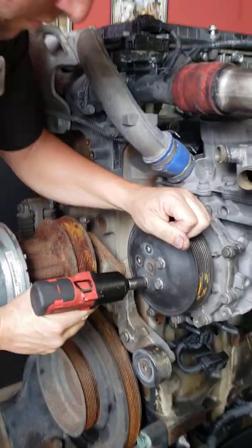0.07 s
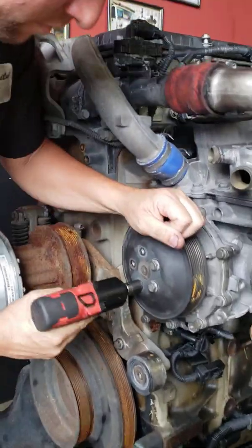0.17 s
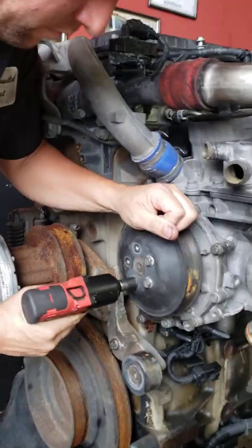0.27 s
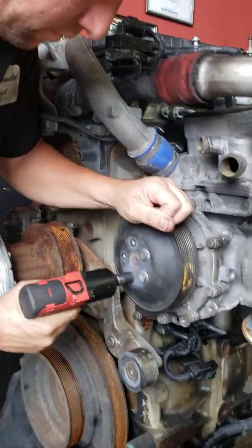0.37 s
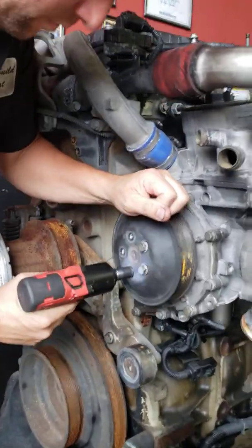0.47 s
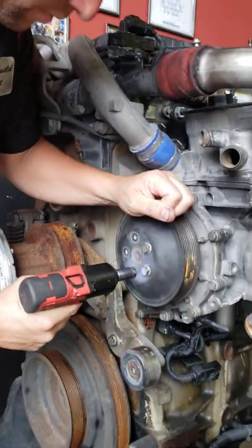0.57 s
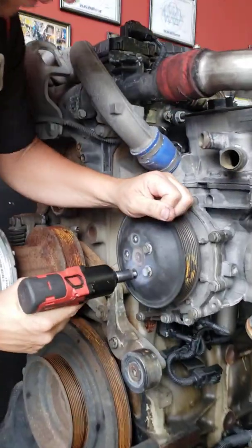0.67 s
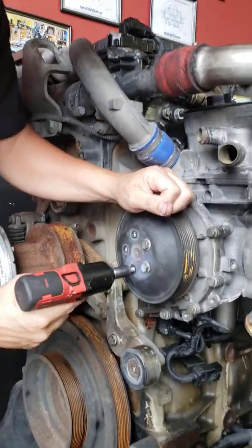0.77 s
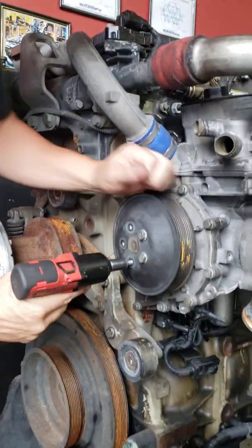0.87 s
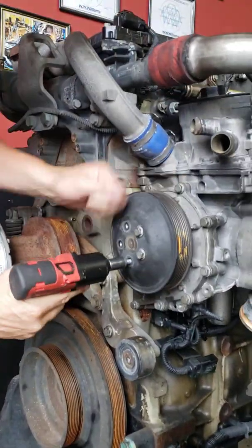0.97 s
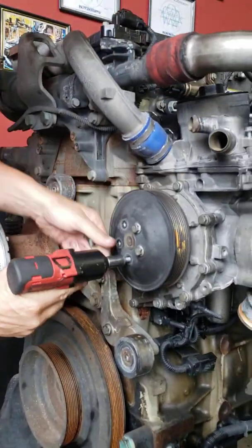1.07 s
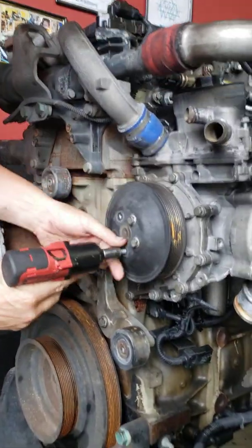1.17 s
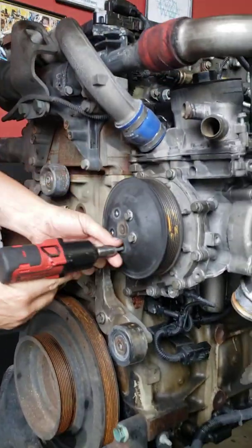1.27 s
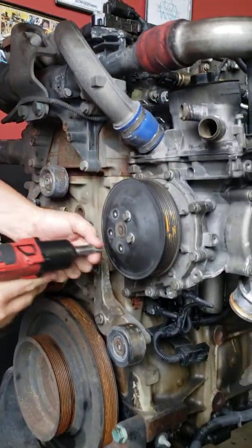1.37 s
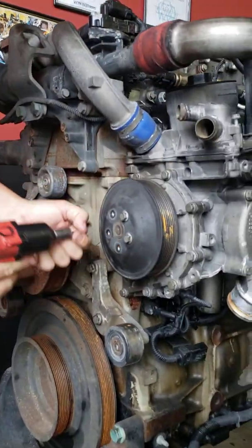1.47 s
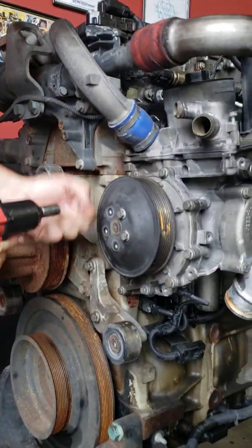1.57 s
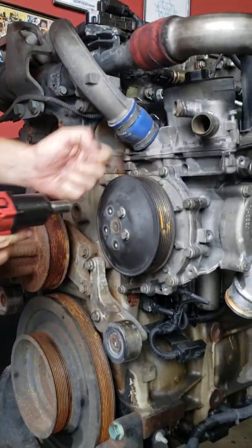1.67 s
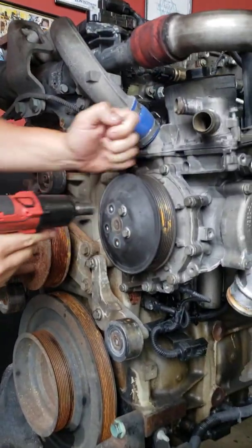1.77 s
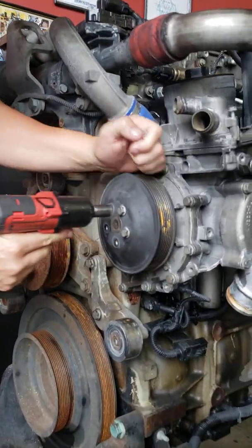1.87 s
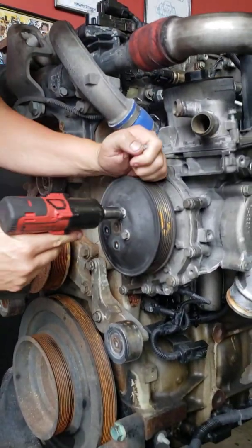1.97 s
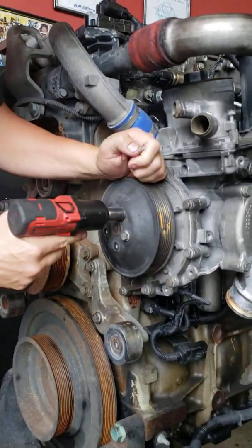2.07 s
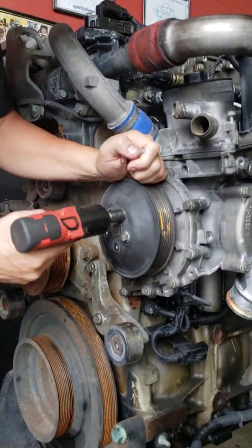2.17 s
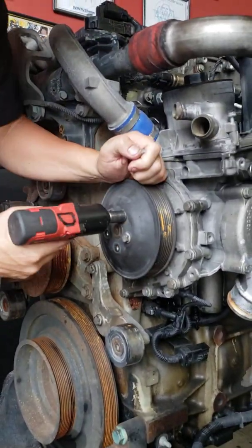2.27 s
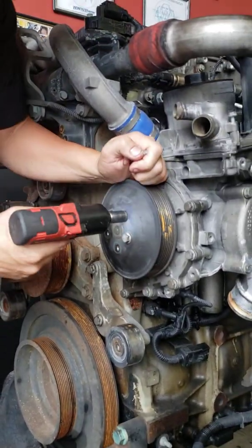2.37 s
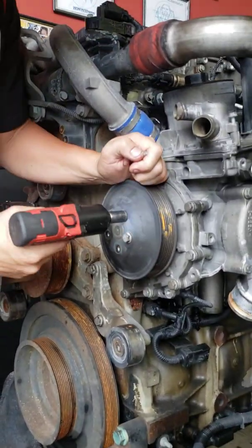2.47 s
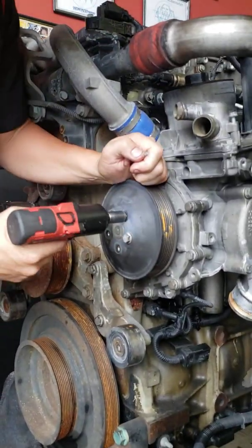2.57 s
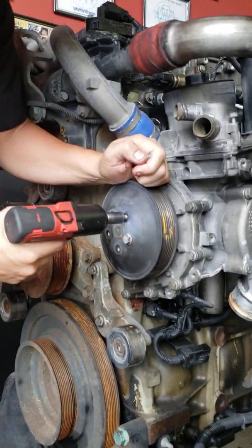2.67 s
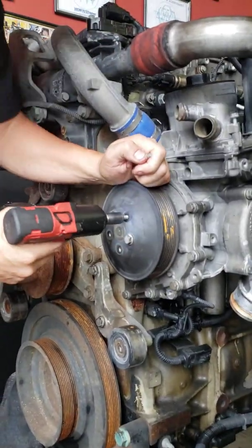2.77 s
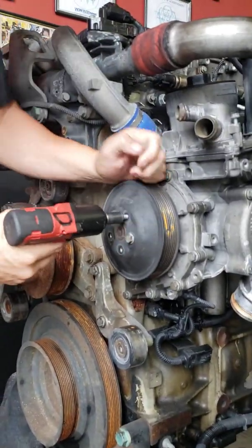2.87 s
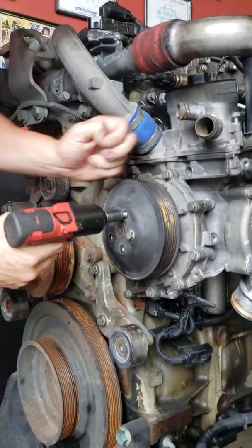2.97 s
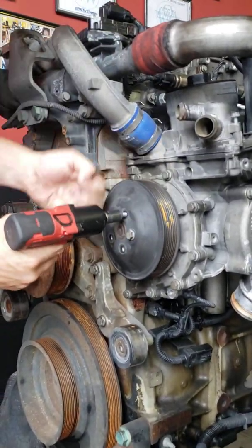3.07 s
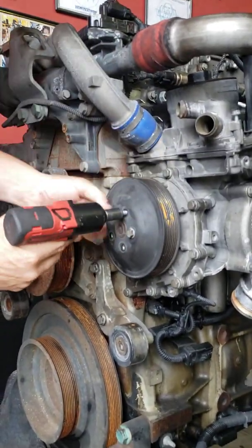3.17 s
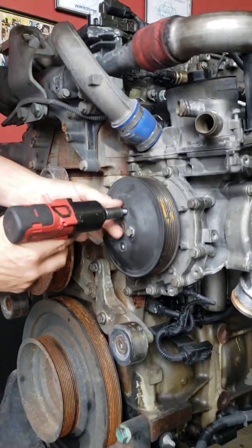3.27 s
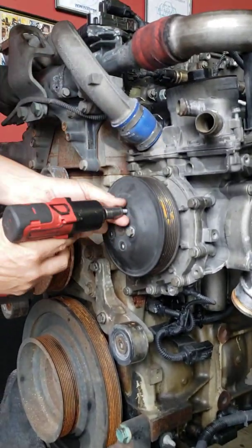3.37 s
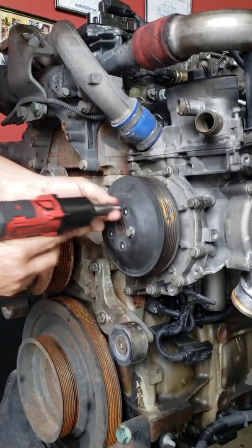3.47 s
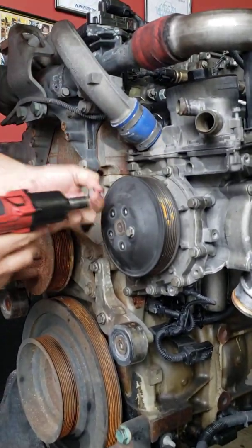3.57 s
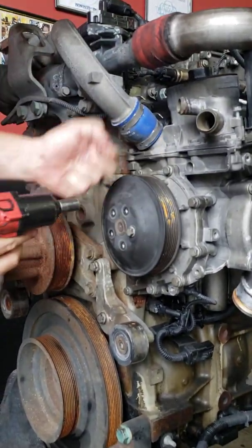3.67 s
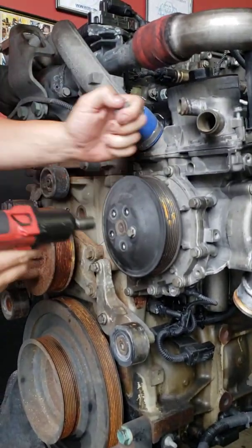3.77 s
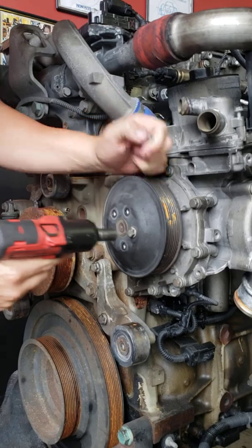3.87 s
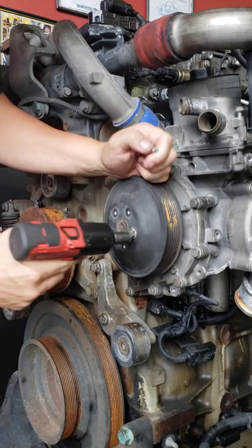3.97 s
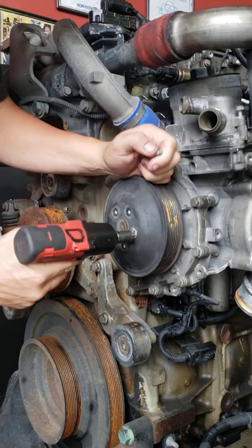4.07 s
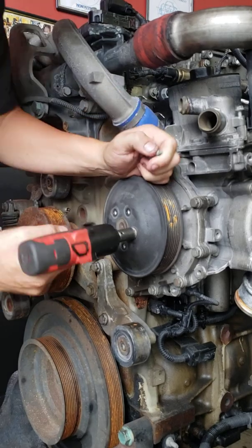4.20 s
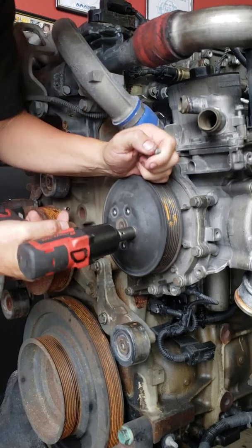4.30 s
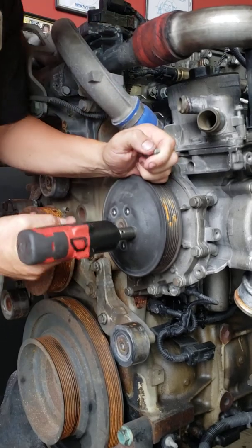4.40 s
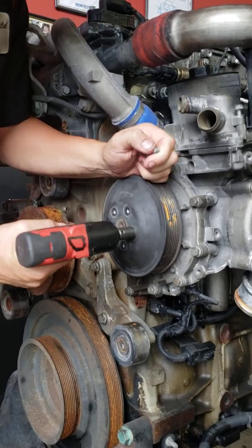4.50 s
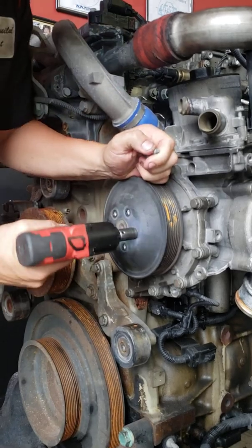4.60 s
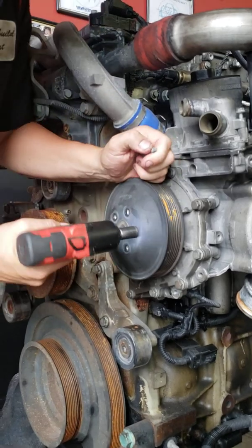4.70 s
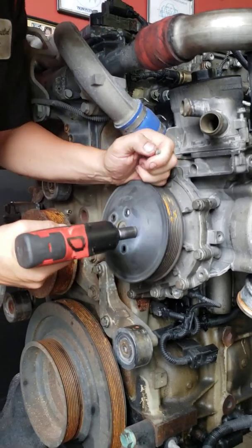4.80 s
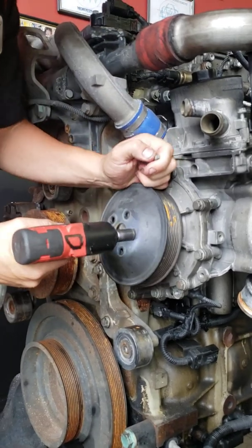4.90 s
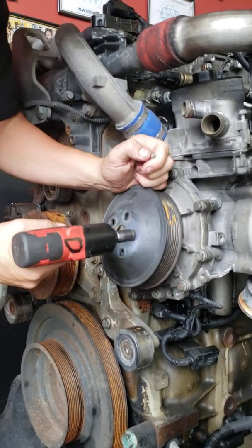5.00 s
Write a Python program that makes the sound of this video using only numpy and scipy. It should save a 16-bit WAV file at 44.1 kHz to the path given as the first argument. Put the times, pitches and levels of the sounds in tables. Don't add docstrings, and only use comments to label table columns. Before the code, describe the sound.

A cordless impact wrench fires three very short hammering bursts, each followed by a whining motor spin-up, with metallic taps between, over low workshop hum.

```python
import sys
import numpy as np
from scipy import signal
from scipy.io import wavfile

SR = 44100
rng = np.random.default_rng(int(sys.argv[2]) if len(sys.argv) > 2 else 0)


def output_pcm(signal):
    pcm = np.clip(np.atleast_2d(signal).T, -1, 1) * 32767
    wavfile.write(sys.argv[1], SR, np.round(pcm).astype(np.int16))


def convert_level_to_amplitude(level_db):
    exponent = np.asarray(level_db, float) / 20
    return 10 ** exponent


N = 222326
TOOL_SIDE_DB = -1.55
# [f/Hz, L-R level/dB]
PORTS = [(60, -1.0), (130, -2.5), (290, 2), (640, -1.5), (1410, -3.0), (3100, -8), (6820, -3),
         (15000, -8.5)]


def blows():
    # [t/s, peak level at 2-7 kHz/dB, brightness re peak/dB]
    blow_rows = [(0.4337, -12.5, -7.5), (0.453, -12.5, -3), (0.4728, -18, 1.5), (0.4902, -14.5, -0.5),
                 (0.511, -19, 4), (0.5302, -18, -2), (2.4666, -11.5, -9.5), (2.4872, -14, -2.5),
                 (2.5048, -14, -2.5), (2.522, -16.5, -2), (2.5443, -17.5, 8.5), (4.652, -11.5, -11.5),
                 (4.6745, -15, 4), (4.695, -18, 0), (4.7120, -16.5, 1.7), (4.7310, -16, 3.5),
                 (4.752, -18, 0.7)]
    # [thud/dB, housing ring/dB, socket ring/dB]
    feeds = (-26.5, -28, -13.5)
    t_s, peak_db, bright_db = np.transpose(blow_rows)
    thud_db, housing_db, socket_db = feeds
    treble_db, slack_db = -2, -10
    first = np.diff(t_s, prepend=-1) > .1
    lows_db = thud_db - peak_db
    highs_db = bright_db + treble_db
    body_db = housing_db - peak_db
    socket_ring_db = socket_db + slack_db * first - peak_db
    return np.transpose([t_s, peak_db, lows_db, highs_db, body_db, socket_ring_db])


def hammering(hammer, bands):
    # [delay/s, level/dB]
    rebounds = [
        (.006, -9),
        (0.013, -13),
    ]
    steel = cracks(hammer, bands, rebounds, level_db=6.5, short=0.42, snap_share=1.0, snap_t60=0.015)
    steel += spikes(hammer, level_db=14.5, low_hz=2480, high_hz=4600)
    steel += spikes(hammer, level_db=6.5, low_hz=10700, high_hz=15200)
    return steel


def taps():
    seating = [(.002, -37.5), (.104, -40), (.163, -29.5), (2.075, -40.5), (2.124, -36.5), (4.277, -22.5),
               (4.605, -47)]
    seating_colour = (1.5, -9.5, -6.5, -25)
    clank_rows = [
        (4.063, -28.5),
        (4.275, -37),
    ]
    clank_colour = (-0.5, -4.5, 2, -10)
    nudges = [(.265, -55.5), (3.969, -65.5), (4.01, -65)]
    nudge_colour = (7, -30.5, 0.5, -27.5)
    ticks = [(.354, -29.5), (1.525, -49), (1.638, -54.5), (2.069, -39), (2.953, -40), (4.254, -31)]
    tick_colour = (-20.5, -9, -26, -28)
    pecks = [(1.48, -53), (2.081, -38)]
    peck_colour = (-27.5, -27, -18, -28)
    jerks = [
        (.412, -52),
        (2.445, -39.5),
        (4.635, -43),
    ]
    jerk_colour = (-11, -21.5, -14.5, -19)
    rattle = [(.803, -36), (.82, -40.5), (.835, -35.5), (.852, -34), (.868, -41), (2.817, -28.5),
              (2.847, -29), (2.872, -29), (2.898, -51), (2.906, -29.5), (2.925, -35)]
    rattle_colour = (-8, -4, -6.5, -20)
    clinks = [(.868, -51), (1.314, -54.5), (2.408, -70.5), (3.25, -87), (3.27, -85), (3.29, -80)]
    clink_colour = (-15, 3, -22.5, 12)
    kinds = ((seating, seating_colour), (nudges, nudge_colour), (ticks, tick_colour), (pecks, peck_colour),
             (jerks, jerk_colour), (rattle, rattle_colour), (clinks, clink_colour))
    clanks = [tuple(row) + tuple(clank_colour) for row in clank_rows]
    knocks = [tuple(row) + tuple(colour) for rows, colour in kinds for row in rows]
    return np.array(clanks), np.array(knocks)


def cracks(events, bands, rebounds, level_db, short, snap_share, snap_t60, rise_s=0.0001):
    # [f/Hz, level per Hz/dB]
    steel_spectrum = [(120, -50), (200, -10), (476, -16), (799, -4.5), (961, -0.5), (1110, -4.5),
                      (1830, -14), (3630, -10.5), (5450, -16.5), (7190, -11), (8490, -40), (12700, 2),
                      (14500, 1.5), (15600, -12), (16500, -27)]
    # [f/Hz, t60/s]
    crack_t60 = [(300, .2), (1000, 0.11), (4000, .085), (8000, 0.035), (15000, 0.045)]
    out = np.zeros((2, N))
    _, peak_db, low_db, high_db, *_ = np.transpose(events)
    snap = convert_level_to_amplitude(-60 / (snap_t60 * SR))
    chatter = convert_level_to_amplitude(1.5 * drift(300))
    for hz, band in bands:
        tilt_db = [at_hz([(900, low), (3000, 0.029), (6500, 0.023), (11000, high)], hz)
                   for low, high in zip(low_db, high_db)]
        chance_db = rng.normal(0, 1.5, len(events))
        clicks = strikes(events, peak_db + tilt_db + chance_db, hz) + 1e-18
        clicks = clicks + sum(convert_level_to_amplitude(db) * np.roll(clicks, int(s * SR), axis=1) for s, db in rebounds)
        fall = convert_level_to_amplitude(-60 / (short * at_hz(crack_t60, hz) * SR))
        body = signal.lfilter([1], [1, -fall], clicks)
        spike = snap_share * min(hz / 4000, 1.2) * signal.lfilter([1], [1, -snap], clicks)
        rise = np.exp(-1 / ((rise_s + 1.5 / hz) * SR))
        shape = signal.lfilter([1 - rise], [1, -rise], body + spike)
        out += convert_level_to_amplitude(at_hz(steel_spectrum, hz) + level_db) * shape * band
    return out * chatter


def spikes(events, level_db, low_hz, high_hz):
    clicks = strikes(events, np.array(events)[:, 1] + level_db, 5200) * rng.choice([-1, 1], N)
    sos = signal.butter(2, [low_hz, high_hz], "band", fs=SR, output="sos")
    pulse = signal.sosfilt(sos, clicks + 1e-18)
    return np.roll(pulse, round(.0008 * SR), axis=1)


def ringing_parts(hammer, clanks, knocks):
    # [f/Hz, level/dB, t60/s]
    housing = [(680, -8, .08), (790, 2, .11), (850, -4, .09), (1100, -6, .2), (1156, -5, .2),
               (1480, -8, .07), (2210, -5, .07), (3280, -4, .07), (3775, -3, .09), (4130, -6, .08),
               (6450, -4, .06), (6950, 0, .06)]
    pulley = [(522, -15, .15), (790, -9, .08), (860, -9, .08), (1103, 0, .18), (1530, -12, .095),
              (1933, -22, .22), (4060, -22, .12), (9900, -24, .15)]
    socket = [(7410, -5, .11), (8371, -19, .2), (9593, -19, .17), (10030, -14, .14), (10580, -17, .13),
              (11610, -14, .1), (12050, -12, .2), (12255, -4, .2), (12390, -8, .13), (12500, -9, .13),
              (12930, -9, .3), (13170, -11, .28), (13385, -12, .15), (13920, -10, .19), (14178, -6, .3),
              (14555, -14, .15), (14960, -3, .22)]
    every = np.concatenate([hammer, clanks, knocks])
    out = ringing(hammer, housing, hammer[:, 4] - 8, free=.75)
    out += ringing(knocks, housing, knocks[:, 4] - 8, free=.6)
    out += ringing(clanks, pulley, clanks[:, 4] - 8, free=1.1)
    out += ringing(every, socket, every[:, 5] - 8, free=.9)
    return out


def ringing(events, modes, ring_db, free):
    out = np.zeros((2, N))
    for hz, mode_db, t60 in modes:
        chance_db = rng.normal(0, 2.0, len(events))
        left, right = strikes(events, np.array(events)[:, 1] + ring_db + mode_db + chance_db, hz)
        out += [ring(left, hz, free * t60), ring(right, hz, free * t60, port_lead(hz))]
    return out


def singing_bracket():
    # [t/s, f/Hz, level/dB, t60/s]
    bracket = (2.96, 1932, -75, 3.2)
    s, hz, db, t60 = bracket
    return ring(convert_level_to_amplitude(db) * (np.arange(N) == int(s * SR)), hz, t60)


def trigger_pulls(t):
    # [pulled t/s, bolt free t/s, let go t/s, spin-up time/s]
    pulls = [
        (.412, .55, .82, .13),
        (2.445, 2.56, 2.895, .17),
        (4.635, 4.77, 5.2, .22),
    ]
    loaded_hz, free_hz, brake_hz_per_s = 2075, 2310, 5000
    rush_start_db, rush_loaded_db, rush_freed_db, rush_steady_db = -54.5, -39, -30, -39
    whine_loaded_db, whine_free_db, whine_brake_db_per_s = -67, -54, 243
    start_s, settle_s, coast_s, stop_s = 0.017, 0.033, 0.034, .035
    coast_db, stop_db = -2.5, -27
    mesh_hz, whine_db, rush_db = np.full(N, float(loaded_hz)), np.full(N, -120.), np.full(N, -120.)
    for pulled, freed, let_go, spin_up in pulls:
        on = (t >= pulled) & (t < let_go + coast_s + stop_s)
        free, after = np.maximum(t[on] - freed, 0), np.maximum(t[on] - let_go, 0)
        lag_hz = (free_hz - loaded_hz) * np.exp(-free / spin_up)
        mesh_hz[on] = free_hz - lag_hz - brake_hz_per_s * after
        settled = 1 - np.exp(-free / settle_s)
        start_db = np.interp(t[on], [pulled, pulled + start_s, freed],
                             [rush_start_db, rush_loaded_db, rush_freed_db])
        end_db = np.interp(after, [0, coast_s, coast_s + stop_s], [0, coast_db, stop_db])
        rush_db[on] = start_db + (rush_steady_db - rush_freed_db) * settled + end_db
        rise_db = np.interp(t[on], [freed, freed + settle_s], [whine_loaded_db, whine_free_db])
        whine_db[on] = rise_db - whine_brake_db_per_s * after
    return mesh_hz, whine_db, rush_db


def motor(bands):
    # [multiple of mesh, level/dB]
    gear_orders = [(.127, -20), (1.0, -3), (1.535, 0), (1.727, 3), (2.045, -1), (5.107, 2)]
    # [f/Hz, level per Hz/dB]
    rush_spectrum = [(120, -40), (200, -18), (420, -19.5), (1100, -12), (1800, -17), (2600, -14.5),
                     (3600, -4.5), (5000, -4), (7060, -12.5), (8330, -10), (10000, -7.5), (11500, -14),
                     (15300, -3), (16500, -15)]
    mesh_hz, whine_db, rush_db = trigger_pulls(np.arange(N) / SR)
    turns = np.cumsum(mesh_hz * (1 + .002 * drift(60))) / SR
    whine = 0
    for order, order_db in gear_orders:
        hz = order * mesh_hz.mean()
        lead = np.array([[0], [port_lead(hz)]])
        side = panned(at_hz(PORTS, hz))[:, None]
        whine = whine + side * convert_level_to_amplitude(order_db + 3 * drift(45)) * np.sin(2 * np.pi * order * turns + lead)
    grain = drift(300)
    rush = 0
    for hz, band in bands:
        level_db = at_hz(rush_spectrum, hz) + 1.5 * grain + 3.8 * drift(20)
        rush = rush + convert_level_to_amplitude(level_db) * band * panned(at_hz(PORTS, hz))[:, None]
    return panned(TOOL_SIDE_DB)[:, None] * (convert_level_to_amplitude(whine_db + 5) * whine + convert_level_to_amplitude(rush_db) * rms_one(rush))


def shop(x):
    # [f/Hz, t60/s, wet level/dB]
    hall = [(200, 0.88, -45), (1080, 0.17, -36), (2250, 0.76, -38), (3240, 0.74, -38), (6843, 0.92, -32),
            (12100, 1.2, -36), (16000, 0.42, -45)]
    length = int(1.2 * SR)
    t, tail = np.arange(length) / SR, 0
    for hz, band in noise_bands(low_hz=190, size=length):
        t60 = at_hz(hall, hz)
        gain = convert_level_to_amplitude(at_hz(hall, hz, column=2)) * np.sqrt(60 / (t60 * hz))
        tail = tail + gain * band * convert_level_to_amplitude(-60 * t / t60) / np.std(band) / np.sqrt(SR / hz)
    tail *= np.clip((t - .006) / 0.011, 0, 1)
    return signal.fftconvolve(tail, (x[0] + x[1])[None], axes=1)[:, :N]


def shop_hum():
    # [f/Hz, level per Hz/dB]
    air_spectrum = [(12, -54), (20, -23), (57, -9.5), (75, -10.5), (147, -23), (300, -33.5), (450, -46.5),
                    (650, -51), (2000, -52.5), (4300, -48.5), (7000, -52), (9500, -67.5), (13000, -63.5),
                    (16500, -58.5)]
    # [t/s, level/dB]
    machine = [(0, 11), (.25, 7), (.5, -8.5), (.85, -12), (1.3, -0.5), (1.6, -2), (2.4, 8), (2.6, 1),
               (3.4, -6.5), (3.65, -12), (4.0, 0.5), (4.6, 2), (5.04, -21)]
    # [f/Hz, rms level/dB]
    mains_lines = [(59.8, -67.5), (119.8, -69.5), (360, -78)]
    air_db, drone_db, rumble_follows = -58, -58.5, .35
    drone_hz, drone_width_hz = 74.1, 4
    t = np.arange(N) / SR
    effort_db = np.interp(t, *np.transpose(machine))
    swell_db = rumble_follows * effort_db
    air = 0
    for hz, band in noise_bands(low_hz=0):
        air = air + convert_level_to_amplitude(at_hz(air_spectrum, hz) + 1.2 * drift(4.6) + swell_db * (hz < 500)) * band
    wander = np.cumsum(drone_width_hz * drift(11)) / SR
    drone = convert_level_to_amplitude(drone_db + effort_db) * np.sqrt(2) * np.sin(2 * np.pi * (drone_hz * t + wander))
    mains = sum(convert_level_to_amplitude(db + 2.0 * drift(1.6)) * np.sqrt(2) * np.sin(2 * np.pi * hz * t)
                for hz, db in mains_lines)
    return convert_level_to_amplitude(air_db) * rms_one(air) + drone + mains


def strikes(events, strength_db, hz):
    s = np.array(events)[:, 0]
    clicks = np.zeros((2, N))
    pan_db = TOOL_SIDE_DB + at_hz(PORTS, hz)
    np.add.at(clicks, (slice(None), (s * SR).astype(int)), convert_level_to_amplitude(strength_db) * panned(pan_db)[:, None])
    return clicks


def ring(clicks, hz, t60, lead=0):
    r, w = convert_level_to_amplitude(-60 / (t60 * SR)), 2 * np.pi * hz / SR
    return signal.lfilter([np.sin(lead), r * np.sin(w - lead)], [1, -2 * r * np.cos(w), r * r], clicks + 1e-18)


def noise_bands(low_hz, size=N):
    # [f/Hz, correlation/1]
    likeness = [(60, .88), (180, .85), (550, .62), (1650, .35), (5000, .15), (15000, .15)]
    edges_hz = 20 * 2 ** np.arange(0, 9.8, 1 / 3)
    white = rng.standard_normal((2, 2, size))
    for k, (low, high) in enumerate(zip(edges_hz, edges_hz[1:])):
        if low >= low_hz:
            sos = signal.butter(2, [low, high], "band", fs=SR, output="sos")
            mid, side = signal.sosfilt(sos, white[k % 2])
            hz = np.sqrt(low * high)
            alike = np.clip(at_hz(likeness, hz), 0, .99)
            yield hz, np.sqrt(1 + alike) * mid + np.sqrt(1 - alike) * side * [[1], [-1]]


def drift(rate_hz):
    r = np.exp(-80 * np.pi * rate_hz / SR)
    slow = signal.lfilter([1], [1, -2 * r, r * r], rng.standard_normal(N // 40 + 2002))[2000:]
    return np.interp(np.arange(N) / 40, np.arange(len(slow)), rms_one(slow))


def port_lead(hz):
    return np.pi / 2 * min(hz / 3000, 1)


def panned(pan_db):
    return convert_level_to_amplitude(np.multiply.outer([.5, -.5], pan_db))


def at_hz(points, hz, column=1):
    return np.interp(np.log(hz), np.log(np.array(points)[:, 0]), np.array(points)[:, column])


def rms_one(x):
    return x / np.sqrt(np.mean(x ** 2) + 1e-20)


def scene():
    hammer, (clanks, knocks), bands = blows(), taps(), list(noise_bands(low_hz=190))
    contacts = np.concatenate([clanks, knocks])
    steel = hammering(hammer, bands[2:])
    steel += cracks(contacts, bands[2:], [], level_db=3.0, short=0.8, snap_share=1.4, snap_t60=0.0017)
    steel += ringing_parts(hammer, clanks, knocks)
    steel += singing_bracket()
    no_bass = signal.butter(2, 330, "high", fs=SR, output="sos")
    near = signal.sosfilt(no_bass, steel) + motor(bands)
    return near + shop(near) + shop_hum()


def roll_off(x):
    return signal.sosfilt(signal.butter(12, 16660, fs=SR, output="sos"), x)


def record(dry):
    # [f/Hz, width/Hz, level/dB]
    mic_dip = (8800, 2000, -6)
    hz, width_hz, dip_db = mic_dip
    for _ in range(2):
        dry = dry - (1 - convert_level_to_amplitude(dip_db)) * signal.lfilter(*signal.iirpeak(hz, hz / width_hz, fs=SR), dry)
    dry = signal.sosfilt(signal.butter(2, 14800, fs=SR, output="sos"), dry)
    rounded = 1.1 * np.tanh(dry / 1.1)
    cut = signal.sosfilt(signal.cheby2(14, 60, 16250, fs=SR, output="sos"), rounded)
    return roll_off(cut)


dry = scene()
out = record(dry)
output_pcm(out)
```